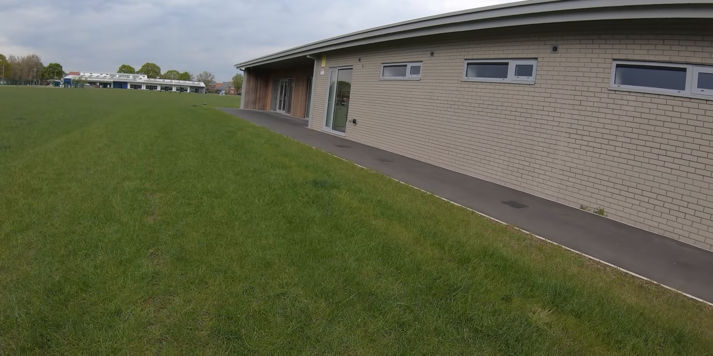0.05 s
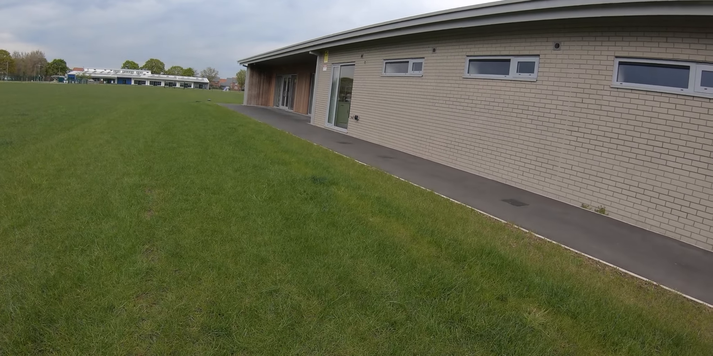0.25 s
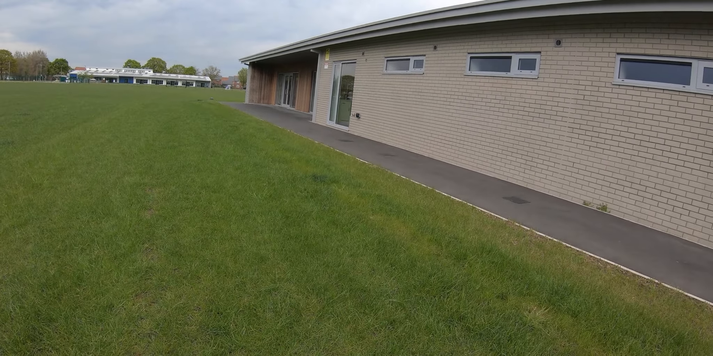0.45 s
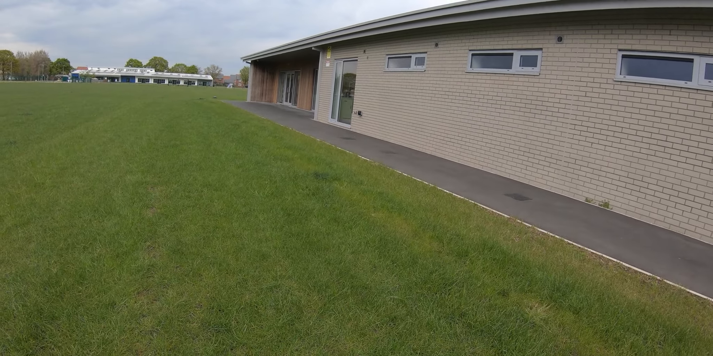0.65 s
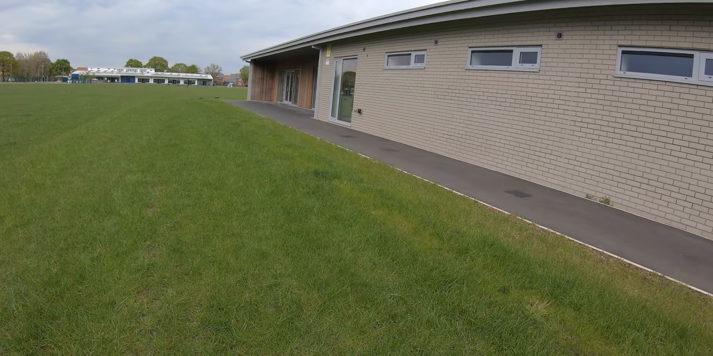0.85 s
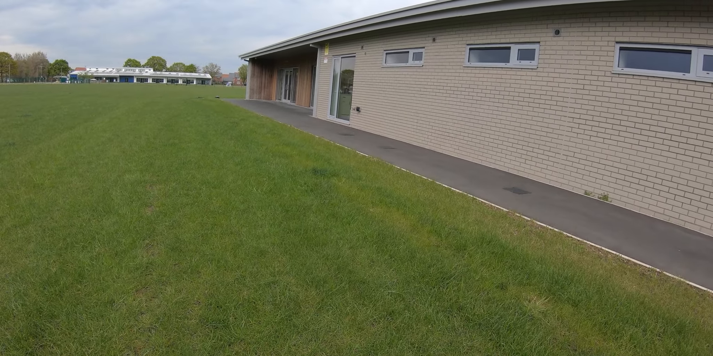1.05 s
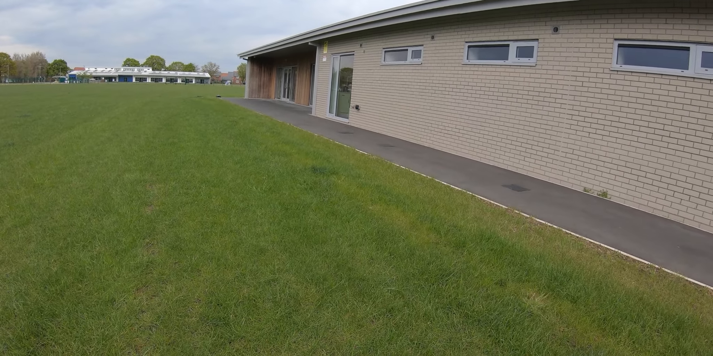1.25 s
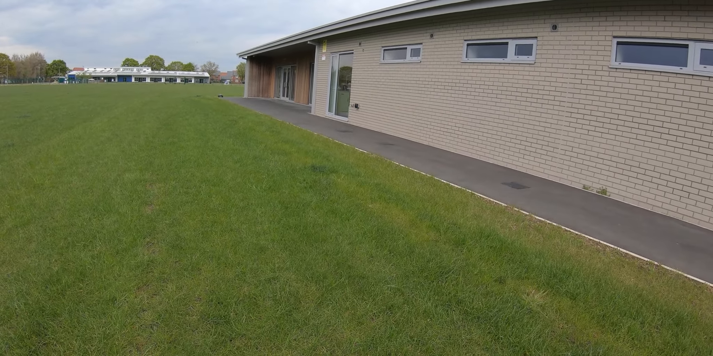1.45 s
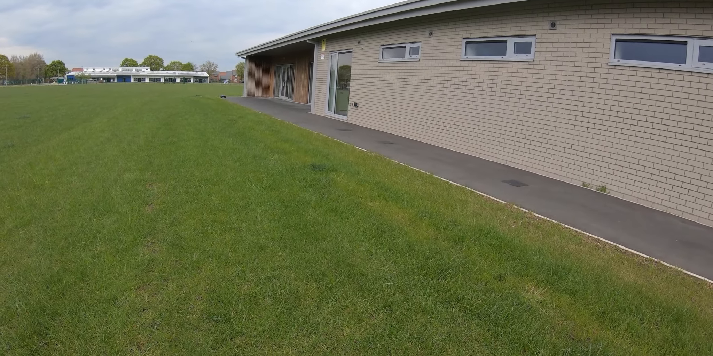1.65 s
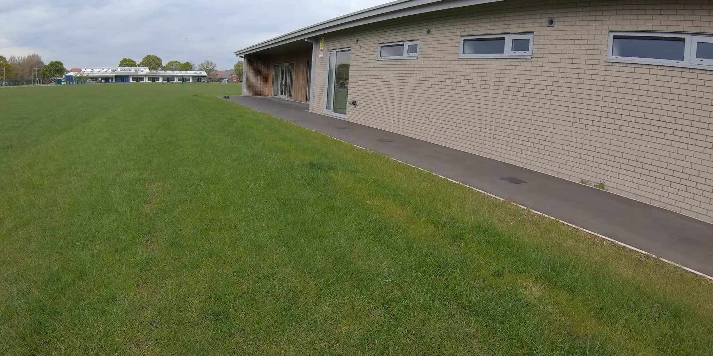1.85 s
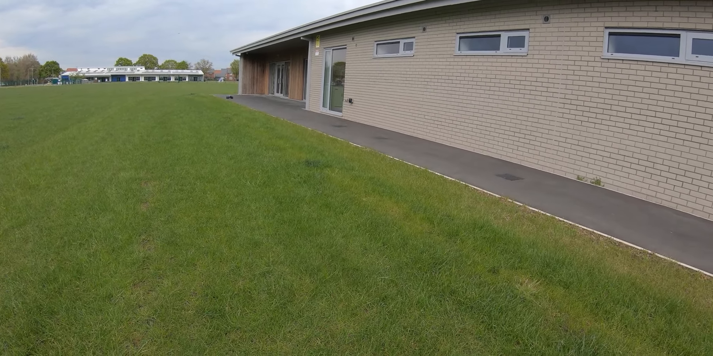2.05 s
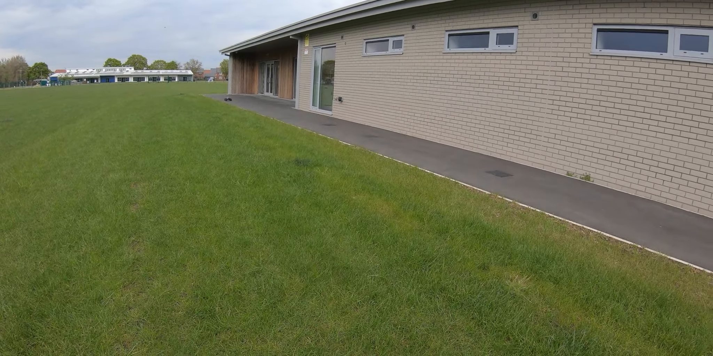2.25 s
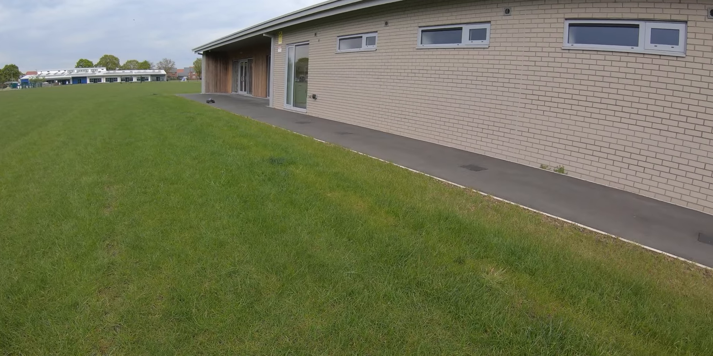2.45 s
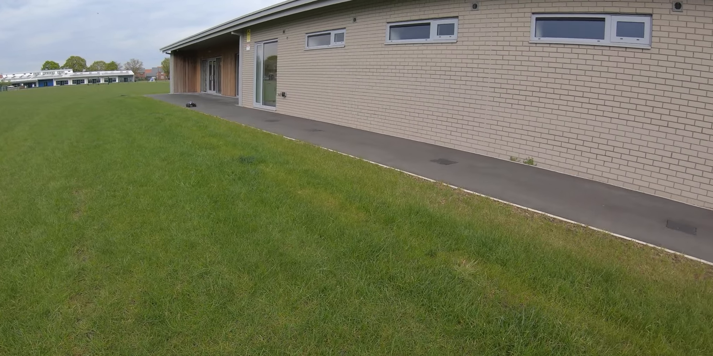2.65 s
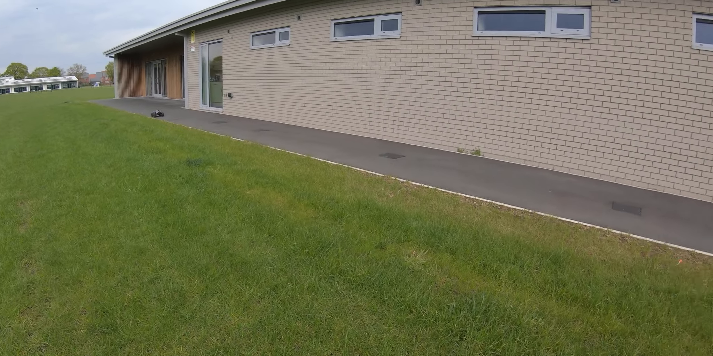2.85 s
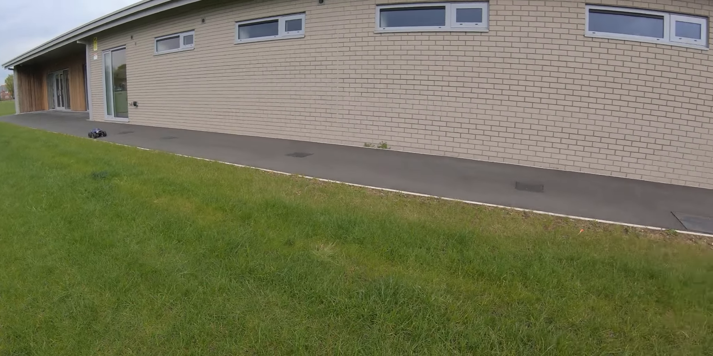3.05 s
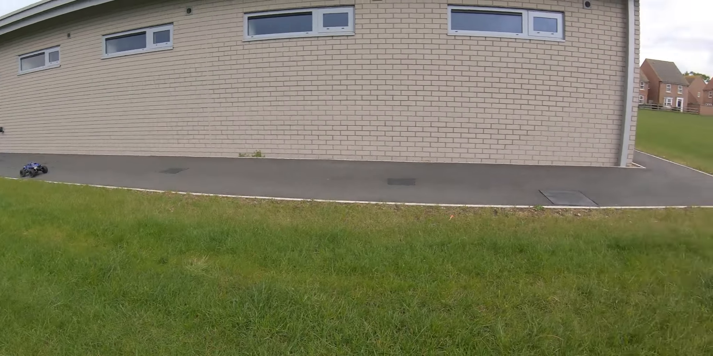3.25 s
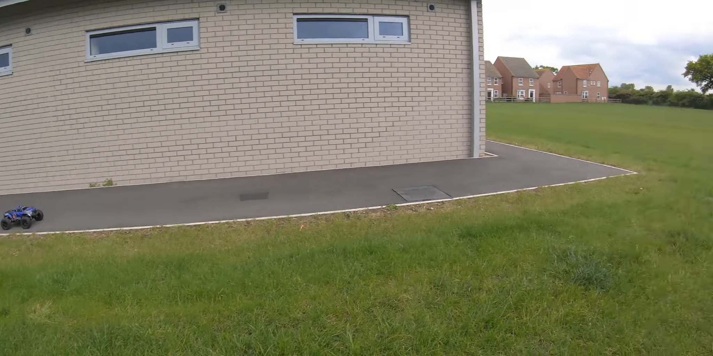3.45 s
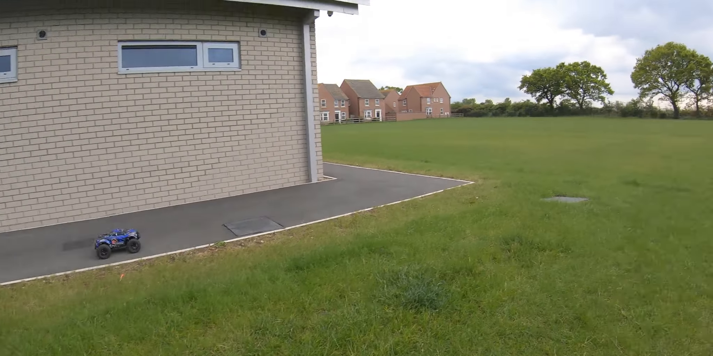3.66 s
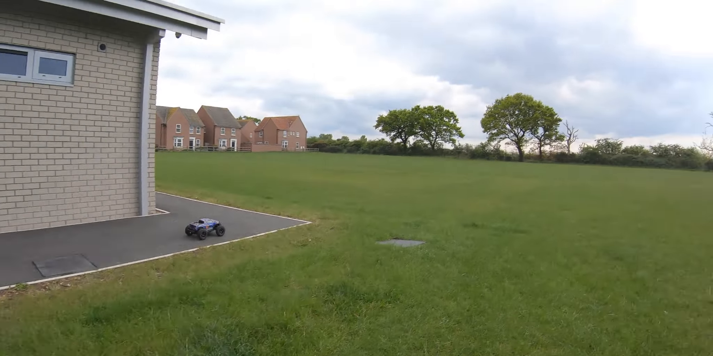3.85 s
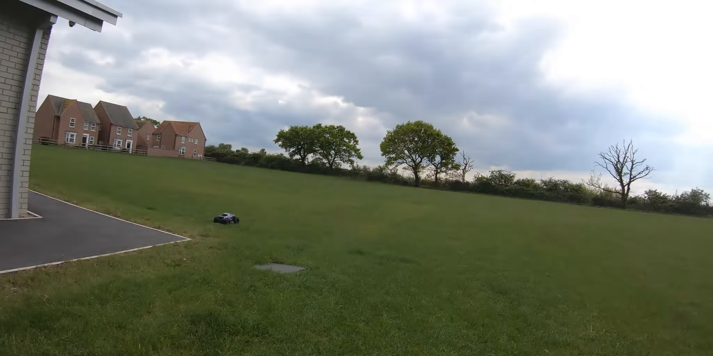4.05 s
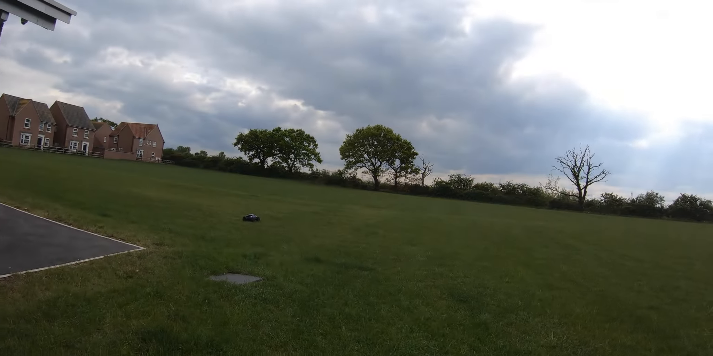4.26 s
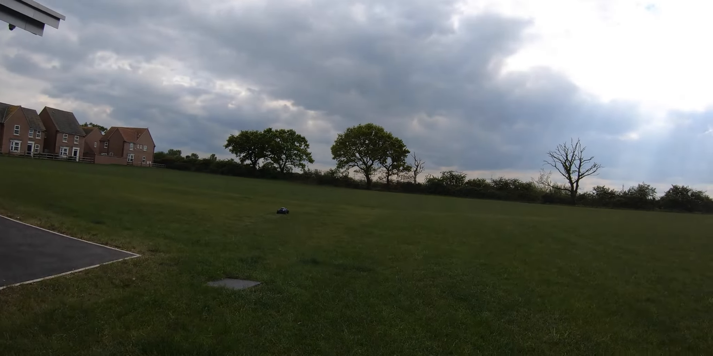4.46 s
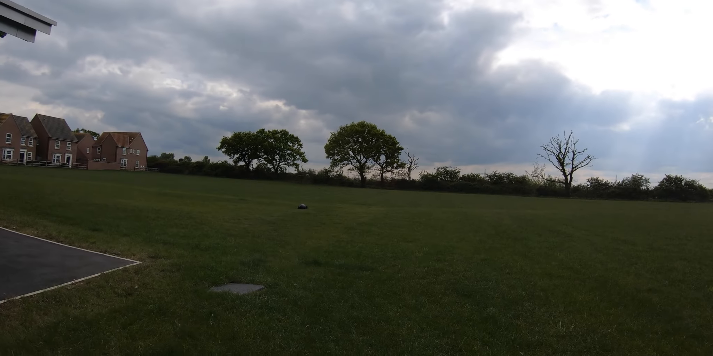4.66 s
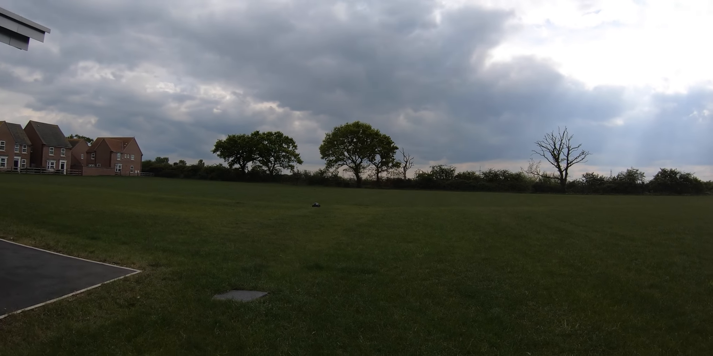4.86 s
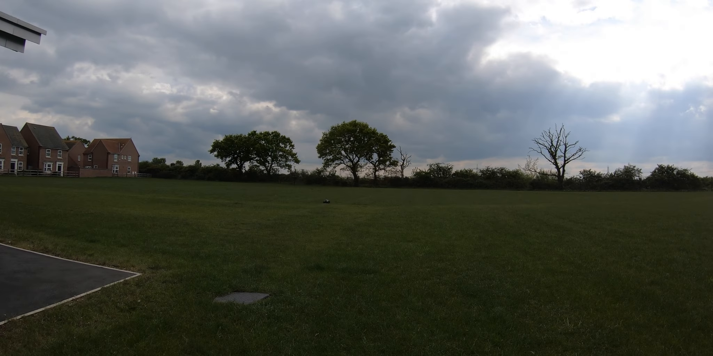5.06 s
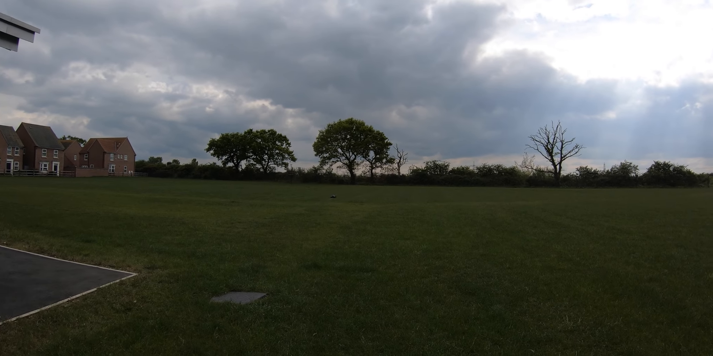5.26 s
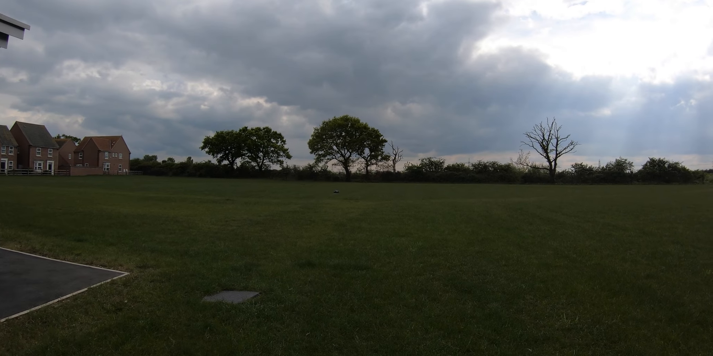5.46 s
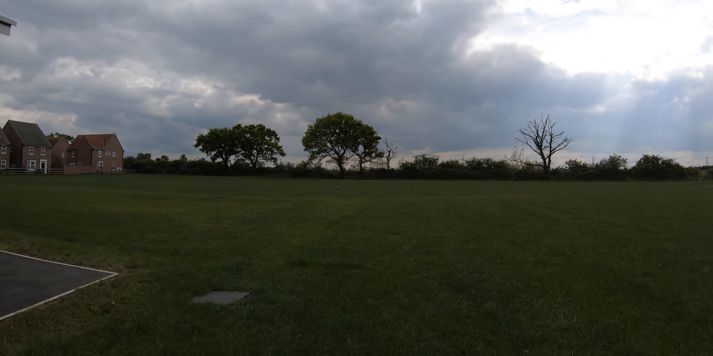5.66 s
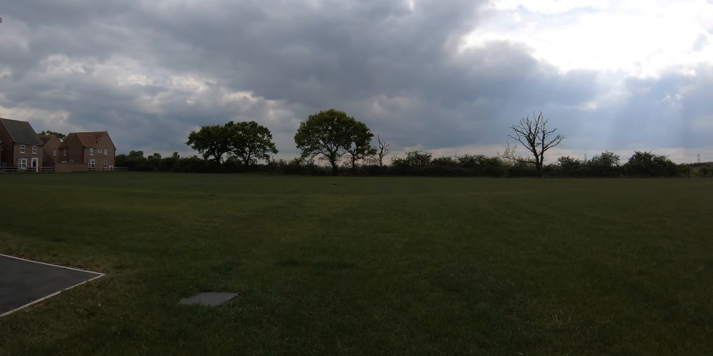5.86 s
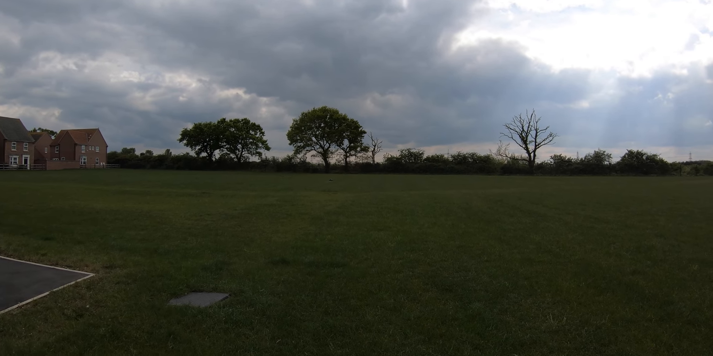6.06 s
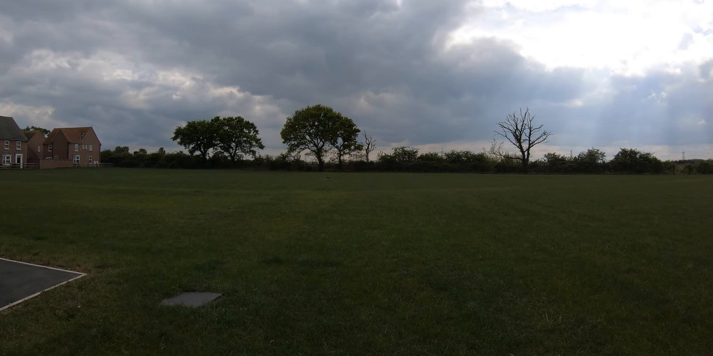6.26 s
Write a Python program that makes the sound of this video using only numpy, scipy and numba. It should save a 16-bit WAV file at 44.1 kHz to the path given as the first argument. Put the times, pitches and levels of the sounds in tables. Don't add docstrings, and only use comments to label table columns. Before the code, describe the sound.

Open field beside a brick wall, hand-held camera microphone. A brief cloth rustle and tiny ticks, then quiet with far traffic drone. A faint electric gear whine wavers, bumps, climbs in pitch and swells as a small model truck speeds past on tarmac, tyres humming and hissing, with a hard knock at closest. It whines away bumpily over grass, fading as low wind thumps buffet the microphone.

```python
import sys
import numpy as np
from scipy import signal
from scipy.fft import rfft, irfft
from scipy.io import wavfile
from scipy.ndimage import uniform_filter1d
from numba import njit

SR = 44100
rng = np.random.default_rng(int(sys.argv[2]) if len(sys.argv) > 2 else 0)


def volts_from_decibels(level):
    exponent = np.asarray(level, float) / 20
    return 10 ** exponent


def materialize(psi):
    bounded = np.clip(np.atleast_2d(psi).T, -1, 1)
    quanta = np.round(bounded * 32767).astype(np.int16)
    wavfile.write(sys.argv[1], SR, quanta)


N = 278535
TIME = np.arange(N) / SR
FREQ = np.fft.rfftfreq(N, 1 / SR) + 1
TARMAC_START_S, TARMAC_END_S = 2.85, 4.1
WALL_ENDS_S = 4.07
CORNER_S = 1.57


def unit(x):
    return x / np.sqrt(np.mean(x ** 2))


def band_unit(x, lo_hz, hi_hz):
    return x / np.std(irfft(rfft(x) * ((FREQ > lo_hz) & (FREQ < hi_hz)), N))


def steady(x, seconds):
    return x / np.sqrt(uniform_filter1d(x ** 2, size=int(seconds * SR)))


def curves(table):
    s, *columns = np.transpose(table)
    gate = np.clip(np.minimum(TIME - s[0] + .05, s[-1] + .05 - TIME) / .05, 0, 1)
    return [gate] + [np.interp(TIME, s, c) for c in columns]


def step(s, width):
    return np.clip((TIME - s) / width + .5, 0, 1)


def swells(table):
    return sum(size * np.exp(-((TIME - s) / max(half_s, .01)) ** 2) for s, size, half_s in table)


def over_hz(table):
    hz, value = np.transpose(table)
    return np.interp(np.log(FREQ), np.log(hz + 1), value)


def coloured(table, x):
    return irfft(rfft(x) * volts_from_decibels(over_hz(table)), N)


@njit
def svf(x, hz, width):
    y, b, l = np.empty(len(x)), 0., 0.
    for i in range(len(x)):
        g, k = np.tan(np.pi * hz[i] / SR), width[i] / hz[i]
        v = (b + g * (x[i] - l)) / (1 + g * (g + k))
        b, l, y[i] = 2 * v - b, l + 2 * g * v, k * v
    return y


def walk(rate):
    k = int(SR / rate)
    held = np.repeat(rng.standard_normal(N // k + 1), k)
    return 1.3 * uniform_filter1d(uniform_filter1d(held, k), k)[:N]


def grit(spread_db, flicker_db, rate):
    grain_db = spread_db * np.minimum(rng.exponential(size=N), 4.5)
    return rng.standard_normal(N) * volts_from_decibels(grain_db + flicker_db * walk(rate))


def pair(colour, spread_db, flicker_db, rate, unlike):
    mid, side = (coloured(colour, grit(spread_db, flicker_db, rate)) for _ in range(2))
    return np.array([mid + unlike * side, mid - unlike * side])


def whine(hz, orders, waver, throb_db, clear_db=0):
    out = 0
    for order, line_db, skirt_db, share in orders:
        pitch = order * hz * (1 + waver * walk(30))
        line = np.sqrt(2) * np.sin(2 * np.pi * np.cumsum(pitch) / SR)
        skirt = svf(svf(rng.standard_normal(N), pitch, share * pitch), pitch, 2 * share * pitch)
        skirt = steady(skirt, .15)
        throb = steady(volts_from_decibels(throb_db * walk(35)), .2)
        out = out + throb * (volts_from_decibels(line_db + clear_db) * line + volts_from_decibels(skirt_db) * skirt)
    return out


def strike(table, crack_share, crack_width, snap, rise_s=.0025):
    out, t = np.zeros((2, N + 8192)), np.arange(8192) / SR
    for (s, db, hz, t60, pan_db), crack in zip(table, rng.standard_normal((len(table), 8192))):
        for _ in range(2):
            crack = svf(crack, np.full(8192, 1. * hz), np.full(8192, crack_width * hz))
        ring = np.sin(2 * np.pi * hz * t) + crack_share * unit(crack) + snap * np.exp(-t * SR / 2)
        decay = np.exp(-np.log(1000) * t / t60)
        rise = 1 - (snap == 0) * np.exp(-(t / rise_s) ** 2)
        i = int(s * SR)
        out[:, i:i + 8192] += volts_from_decibels(db + np.array([[pan_db], [-pan_db]]) / 2) * ring * decay * rise
    return out[:, :N]


# (frequency [Hz], density [dB per Hz])
TOWN_COLOUR = [(35, -34), (60, -15), (183, 9), (440, -8.5), (580, -9), (772, -4), (927, -17), (2770, -20),
               (3560, -8), (4270, -22), (8280, -31), (14000, -60)]


def town():
    return volts_from_decibels(-57) * band_unit(pair(TOWN_COLOUR, spread_db=1.3, flicker_db=0.5, rate=5, unlike=0.33), 100, 630)


# (time [s], level [dB])
RUSTLES = [
    [(0, -53.5), (.1, -55.5), (.2, -51.5), (.3, -55), (.38, -68), (.5, -84)],
    [(5.88, -90), (6.0, -65.5), (6.09, -59.5), (6.2, -61.5), (6.32, -75)],
]
# (frequency [Hz], density [dB per Hz])
RUSTLE_SPECTRUM = [(240, -14), (400, -5.5), (518, -10), (640, -5.5), (734, -6.5), (1820, -2), (4960, -11.5),
                   (7930, -8), (15000, -33)]


def rustle():
    level = sum(on * volts_from_decibels(db) for on, db in map(curves, RUSTLES))
    fibres = pair(RUSTLE_SPECTRUM, spread_db=1.8, flicker_db=1.0, rate=50, unlike=.5)
    return level * band_unit(fibres, 5000, 11000)


# (time [s], peak [dB], ring [Hz], decay t60 [s], left minus right [dB])
DRY_TICKS = [
    (.0235, -24, 2300, .006, 2),
    (.22, -35, 2200, .012, 4),
]


def ticks():
    return strike(DRY_TICKS, crack_share=.2, crack_width=2, snap=1.6) / 2


# (time [s], level [dB], half length [s], sharpness [dB], left minus right [dB])
PORT_GUSTS = [(1.548, -50.5, 0.021, -21, 6), (1.797, -57, 0.067, -28, 6), (2.038, -49.5, 0.033, -24, 0),
              (2.336, -44.5, 0.021, -24, 12), (2.605, -57.5, 0.097, -7, -3), (2.869, -51, 0.017, -3, -12),
              (2.964, -41.5, 0.031, -4.5, 4), (3.187, -49.5, 0.087, 3.5, 2), (3.485, -43.5, 0.084, -1, -8),
              (3.696, -44, 0.12, 6, 2), (3.749, -29, 0.04, 3, 8.5), (3.89, -32, 0.14, -1.5, 5),
              (4.038, -34, 0.071, 0.5, -1.5), (4.2, -38.5, 0.085, -25, -5), (4.383, -46, 0.05, 7.5, -2.5),
              (4.718, -48.5, 0.1, 3.5, -3.5), (5.095, -43, 0.087, -3, -2.5), (5.223, -41.5, 0.028, -19, 18),
              (5.424, -37, 0.071, -9, -4), (5.598, -31.5, 0.045, 0.5, 2.5),
              (5.764, -29.5, 0.12, -12.5, -0.5), (6.079, -30, 0.0096, 3, 8), (6.192, -28, 0.058, -6.5, 3),
              (6.292, -31.5, 0.036, 4, 2.5)]
# (time [s], level [dB])
EARLY_PUFFS = [(.28, -61), (.55, -66), (.78, -61), (1.02, -64), (1.46, -73), (.42, -69), (.66, -70),
               (1.17, -71), (2.18, -63), (2.28, -61)]


def gusts():
    deep = np.full((2, N), volts_from_decibels(-80) ** 2)
    sharp = deep * volts_from_decibels(-12) ** 2
    puffs = [(s, db, 0.023, -21, 0) for s, db in EARLY_PUFFS]
    for s, db, half_s, sharp_db, pan_db in PORT_GUSTS + puffs:
        away = (TIME - s) / max(half_s, .01)
        fall_db = 9 * (np.sqrt(1 + away ** 2) - 1)
        power = volts_from_decibels(db - fall_db) ** 2 * volts_from_decibels(np.array([[pan_db], [-pan_db]]))
        deep, sharp = deep + power, sharp + power * volts_from_decibels(sharp_db) ** 2
    return np.sqrt(deep), np.sqrt(sharp)


def wind():
    deep, sharp = gusts()
    db = 10 * np.log10(deep[0] * deep[1])
    low_hz = np.clip(82.5 + 0.94 * (db + 23.5), 42, 95)
    low_colour = [(15, 17), (30, 8.5), (42, 5), (130, -4.0), (250, -24), (2000, -5)]
    edge_colour = [(70, -15.5), (140, 4.5), (220, -2.5), (400, -25.5), (800, -43.0), (3000, -60), (9000, -110)]
    out = []
    for side in range(2):
        eddies = volts_from_decibels(5.7 * walk(35))
        low = svf(svf(rng.standard_normal(N), low_hz, 0.55 * low_hz), low_hz, 3.0 * low_hz)
        low = steady(coloured(low_colour, low) * eddies, 0.095)
        edge = coloured(edge_colour, rng.standard_normal(N))
        edge = steady(edge * eddies ** 1.5, 0.066)
        out.append(volts_from_decibels(2.5) * deep[side] * low + sharp[side] * edge)
    return np.array(out)


# (time [s], gear mesh [Hz], nearness [dB], load on the teeth [dB])
DRIVE_PATH = [(.35, 670, -60.5, 2), (.72, 755, -65, 1), (.97, 778, -61.5, 5), (1.48, 750.2, -58.5, -5),
              (1.78, 825.1, -53, -3.5), (1.98, 900, -54, -8), (2.1, 1078, -51.5, -1.5),
              (2.48, 1116, -49.5, -2.5), (2.7, 1310, -44.5, 2), (2.85, 1352, -44.5, 3.5),
              (3.1, 1436, -40, 4), (3.48, 1489, -36, 3), (3.75, 1485, -34.5, 10), (3.9, 1470, -37, 4),
              (4.17, 1433, -48.5, 7.5), (4.55, 1420, -52.5, 2.5), (5.6, 1410, -61.5, -2.5),
              (5.95, 1327, -65, -14)]


def drive():
    return curves(DRIVE_PATH)


# (order [mesh rates], line [dB], skirt [dB], skirt width [share of pitch])
MESH_ORDERS = [(1., -4.5, -6.5, .035), (1.048, -20, -9, .06), (.94, -26, -15, .07)]


def mesh_fundamental(wheel_hz, mesh_db):
    return volts_from_decibels(mesh_db) * whine(wheel_hz, MESH_ORDERS, waver=.0015, throb_db=1.5)


# (order [mesh rates], line [dB], skirt [dB], skirt width [share of pitch])
MESH_OVERTONES = [(2., -6.5, -3.5, .045), (3., -8.5, -5, .04)]
# (order [mesh rates], line [dB], skirt [dB], skirt width [share of pitch])
UPPER_ORDERS = [(3.5, -28, -19, .03), (4., -16, -14, .025), (5., -13, -6, .04), (5.4, -30, -12, .05),
                (6., -30, -19, .04), (7., -30, -21, .04)]
# (time [s], gain [dB], half length [s])
SECOND_SWELLS = [(2.12, -8, .1), (2.35, -14, .15), (2.9, 5, .15), (3.25, 5, .15), (4.2, 4, 0.052),
                 (4.45, 4, 0.075), (4.72, 2, 0.073), (5.1, 0.5, 0.1)]
# (time [s], gain [dB], half length [s])
SHRIEK = [
    (4.23, 12, 0.074),
]
# (frequency [Hz], gain [dB])
SHELL_RING = [(2400, -2), (3000, -1), (3500, 2.5), (4000, 2), (4500, 1.5)]


def mesh_overtones(hz, wheel_hz, over_db):
    second = whine(wheel_hz, MESH_OVERTONES[:1], waver=.004, throb_db=1.3, clear_db=1)
    second = volts_from_decibels(swells(SECOND_SWELLS)) * second
    third = whine(wheel_hz, MESH_OVERTONES[1:], waver=.006, throb_db=2.2)
    third = volts_from_decibels(-4.5 * step(2.9, .3)) * third
    fast = np.clip((hz - 1150) / 300, 0, 1)
    top_db = over_db - 11 * (1 - fast) - 2 * step(TARMAC_END_S, .2) + swells(SHRIEK)
    top = volts_from_decibels(top_db) * whine(wheel_hz, UPPER_ORDERS, waver=.003, throb_db=2.5)
    return coloured(SHELL_RING, volts_from_decibels(over_db) * (second + third)) + top


# (order [pinion rates], line [dB], skirt [dB], skirt width [share of pitch])
PINION_ORDERS = [(1., -14, -4, .04), (.9, -26, -11, .04), (2., -36, -23, .04)]
# (order [pinion rates], line [dB], skirt [dB], skirt width [share of pitch])
CRAWL_ORDERS = [(.88, -17, -8, .04), (.94, -20, -11, .03), (1.06, -26, -16, .035)]
# (time [s], gain [share of pitch], half length [s])
MOTOR_SURGES = [(1.22, .08, .04), (1.85, .07, 0.04), (2.12, .04, 0.039), (2.58, -.03, .03),
                (2.67, .01, .02), (2.73, .03, 0.017), (2.8, -.02, .04), (4.5, -.015, .05),
                (4.65, 0.0044, .04), (4.95, -.015, .05), (5.12, -0.021, 0.053), (5.22, 0.018, 0.042),
                (5.36, -.02, 0.031), (5.46, .015, .04), (5.66, 0.0026, .04)]
# (time [s], gain [dB], half length [s])
BURSTS = [(.62, 10, .03), (.78, 10, 0.02), (.97, 5, 0.039), (1.16, 10, 0.011), (1.29, 4.5, 0.032),
          (4.15, 3, 0.045), (4.67, 5, 0.03), (4.8, 3.5, 0.057), (5.05, 2, 0.027), (5.22, 1.5, 0.033),
          (5.38, 5, 0.06), (5.52, 0, 0.032), (5.7, 4, 0.056), (1.8, 6, 0.069), (1.95, 0, 0.052),
          (2.63, 3, 0.047), (2.75, -2.5, .04), (2.95, 0.5, .1), (3.15, -6, 0.13)]


def pinion(hz, near_db, slip):
    crawl_hz = np.minimum(3700, 4.9 * hz)
    pinion_hz = np.maximum(4.48 * hz, crawl_hz) * (1 + swells(MOTOR_SURGES))
    level_db = -10 * np.log10(volts_from_decibels(-near_db - 4) ** 2 + volts_from_decibels(41.5) ** 2)
    level_db = level_db + 1.5 * step(TARMAC_END_S, 0.37) * (walk(19) - .6)
    level_db = level_db - 8 * (1 - step(0.65, 0.19))
    clear_db = 7 * step(2.45, .3)
    tone = whine(pinion_hz * slip, PINION_ORDERS, waver=.006, throb_db=2.5, clear_db=clear_db)
    strand = whine(pinion_hz, CRAWL_ORDERS, waver=.01, throb_db=3)
    tone = volts_from_decibels(swells(BURSTS)) * tone + np.clip((5000 - pinion_hz) / 700, 0, 1) * strand
    return volts_from_decibels(level_db) * tone


# (time [s], overtone gain [dB], half length [s])
GRIP_SWELLS = [(1.98, 8, .06), (2.11, 12, .03), (2.19, -8, 0.046), (2.35, 5, .08), (2.48, 13, 0.052),
               (2.63, 3.5, 0.12), (2.77, -23, 0.042), (2.95, -1.5, .1), (3.3, -5.5, 0.2), (3.75, -2, 0.089),
               (4.75, 4.5, 0.068), (5.35, 0, .08)]
# (time [s], gain [share of pitch], half length [s])
WHEEL_WOBBLES = [(2.2, -0.022, .04), (2.33, 0.013, 0.047), (2.48, -.015, 0.037), (2.6, .015, 0.036),
                 (2.71, -0.028, 0.036), (4.2, .03, .03), (4.68, .01, 0.049), (4.77, -.02, .035),
                 (4.98, .02, .06), (5.12, -.02, .04), (5.24, 0.01, .05), (5.45, -0.021, 0.042),
                 (5.62, .015, 0.063)]
# (frequency [Hz], gain [dB])
GEAR_TOP_FADE = [(10500, 0), (12200, -22), (15000, -50)]


def gears():
    on, hz, near_db, load_db = drive()
    _, air, sag, bite_db = hops()
    hz = hz * (1 + .015 * air - sag)
    slack_db = -15 * air
    mesh_db = near_db + load_db + slack_db + bite_db
    over_db = near_db + 0.049 * load_db + 0.63 * bite_db + 0.086 * slack_db
    over_db = over_db - 6.5 * np.clip((1000 - hz) / 150, 0, 1)
    over_db = np.minimum(over_db + swells(GRIP_SWELLS), mesh_db + 6)
    smooth = np.clip(np.minimum(TIME - TARMAC_START_S, TARMAC_END_S - TIME) / .15, 0, 1)
    slip = 1 + (.009 - .0075 * smooth) * walk(22)
    wheel_hz = hz * slip * (1 + swells(WHEEL_WOBBLES))
    mesh = mesh_fundamental(wheel_hz, mesh_db) + mesh_overtones(hz, wheel_hz, over_db) + odd_axles(near_db)
    return coloured(GEAR_TOP_FADE, on * (mesh + pinion(hz, near_db, slip))) + tread(hz, near_db)


# (frequency [Hz], density [dB per Hz])
HISS_COLOUR = [(300, -9), (600, -6.5), (1200, -3), (2200, -0.5), (3000, 1.5), (3800, -3), (5300, -7),
               (7500, -7.5), (8300, -10.5), (9000, -17.5), (10300, -16), (12000, -25.5), (14000, -28.5),
               (15500, -60)]
# (time [s], hiss gain [dB], half length [s])
GRASS_TUFTS = [(4.08, 2.5, 0.053), (4.22, 4, 0.069), (4.45, -3, 0.046), (4.7, 2, 0.16), (5.02, -4.5, 0.13),
               (5.25, 1.5, 0.059), (5.42, 3, 0.025), (5.52, 0, 0.044), (5.7, 4, .05)]
# (frequency [Hz], gain [dB])
GRASS_CANCEL = [(1300, 5), (2200, -2.5), (3600, 1.5), (7500, 2), (9000, -1), (13000, -6)]
# (frequency [Hz], gain [dB])
FAR_CANCEL = [(400, 13), (560, -13), (750, -1.5), (1500, 4), (2200, -0.5), (2800, -5), (3400, -5),
              (4500, -1.5)]


def tyre_hiss():
    on, _, near_db, _ = drive()
    treble_db = -6.5 - 3.5 * np.maximum(4.82 - TIME, 0)
    treble_db = treble_db - 34 * (1 - step(CORNER_S, 0.56))
    tufts_db = swells(GRASS_TUFTS)
    hiss = 0
    for centre_hz in 350 * 2 ** np.arange(0, 5.6, .5):
        grains = grit(spread_db=2.5, flicker_db=-1.73, rate=7.27)
        band = svf(grains, np.full(N, centre_hz), np.full(N, centre_hz / 2.14))
        lost = np.clip(centre_hz / 9500, 0, 1.5) ** 2.83
        band_db = lost * (treble_db + 11.5) + min(centre_hz / 5000, 1) * tufts_db
        hiss = hiss + band / np.std(band) * np.sqrt(centre_hz / 2000) * volts_from_decibels(band_db)
    hiss = volts_from_decibels(near_db - 3) * coloured(HISS_COLOUR, hiss * volts_from_decibels(.8 * walk(25)))
    on_grass = step(WALL_ENDS_S + 0.16, 1.0)
    hiss = (1 - on_grass) * hiss + on_grass * coloured(GRASS_CANCEL, hiss)
    hidden = 1 - step(CORNER_S, 0.61)
    hiss = (1 - hidden) * hiss + hidden * coloured(FAR_CANCEL, hiss)
    spray = volts_from_decibels(7.5) * hops()[0] / volts_from_decibels(near_db + 18.5)
    return on * hiss * np.sqrt(1 + spray ** 2)


# (time [s], pitch [Hz], level over nearness [dB])
FREE_WHEEL_PATH = [
    (.9, 1566, -21),
    (1.13, 1570, 4),
    (1.2, 1786, 2),
    (1.27, 1753, -6),
    (1.31, 1620, 6),
    (1.36, 1610, -9),
]
# (time [s], pitch [Hz], level over nearness [dB])
REAR_AXLE_PATH = [
    (1.85, 1710, -15),
    (1.96, 1790, -8),
    (2.05, 1930, 1.5),
    (2.12, 2090, -7),
    (2.27, 2134, -6),
]
# (time [s], mesh [Hz], level over nearness [dB])
WHEELSPIN_PATH = [
    (2.1, 1278, -7),
    (2.3, 1268, -2),
    (2.62, 1258, 10),
]
# (order [mesh rates], line [dB], skirt [dB], skirt width [share of pitch])
WHEELSPIN_ORDERS = [(1., -14, -8, .06), (3., -19, -14, 0.025)]


def odd_axles(near_db):
    free, free_hz, free_db = curves(FREE_WHEEL_PATH)
    out = free * volts_from_decibels(near_db + free_db) * whine(free_hz / 2, MESH_OVERTONES[:1], waver=.02, throb_db=3)
    lagging, rear_hz, rear_db = curves(REAR_AXLE_PATH)
    rear = whine(rear_hz / 2, MESH_OVERTONES[:1], waver=.008, throb_db=2)
    out = out + lagging * volts_from_decibels(near_db + rear_db) * rear
    spinning, spin_hz, spin_db = curves(WHEELSPIN_PATH)
    front = whine(spin_hz, WHEELSPIN_ORDERS, waver=0.0104, throb_db=-0.5)
    return out + spinning * volts_from_decibels(near_db + spin_db) * front


# (time [s], length [s], first pitch [Hz], last pitch [Hz], level [dB])
BIRD_NOTES = [
    (1.135, .1, 5680, 5440, -66),
    (5.926, 0.045, 3370, 3690, -60),
]


def birds():
    out = np.zeros(N)
    for s, length, first_hz, last_hz, db in BIRD_NOTES:
        u = np.clip((TIME - s) / length, 0, 1)
        phase = 2 * np.pi * np.cumsum(first_hz + (last_hz - first_hz) * u) / SR
        out += volts_from_decibels(db) * np.sin(np.pi * u) ** 0.32 * np.sin(phase)
    return out * volts_from_decibels(2 * walk(34.6))


# (time [s], thud [dB], time in the air [s], speed lost [share])
HOP_LANDINGS = [(1.25, -47.5, 0.097, 0.0039), (1.299, -72, 0.035, 0.048), (3.831, -34.5, 0.021, 0),
                (4.08, -44.5, 0.021, 0.003), (4.325, -40, 0.14, 0.027), (4.699, -45, 0.031, 0.013),
                (5.039, -54, 0.0406, .025), (5.368, -53.5, 0.033, 0.007), (5.58, -56.5, 0.025, 0.0022),
                (5.759, -51.5, 0.021, 0.0016)]


def hops():
    rise_s, sag_s, bite_s = 0.089, .06, .13
    thud, air, sag, bite_db = 0, 0, 0, 0
    for s, db, air_s, share in HOP_LANDINGS:
        since, down = np.maximum(TIME - s, 0), step(s, .02)
        thud = thud + volts_from_decibels(db - 62 * since) ** 2 * step(s - rise_s / 2, rise_s)
        air = air + min(air_s * 8, 1) * step(s - air_s, .02) * (1 - down)
        sag = sag + share * since / sag_s * np.exp(1 - since / sag_s)
        bite_db = bite_db + 75 * air_s * down * np.exp(-(since / bite_s) ** 2)
    return np.sqrt(thud), air, sag, bite_db


# (time [s], peak [dB], ring [Hz], decay t60 [s], left minus right [dB])
CHASSIS_BUMPS = [(1.249, -46.5, 296, 0.04, -4), (1.297, -38.5, 194, 0.043, 0), (1.287, -36, 303, 0.027, 0),
                 (1.33, -59, 376, 0.25, -2), (4.085, -32, 221, 0.25, -1), (4.33, -34, 179, 0.19, -6),
                 (5.045, -45, 378, 0.18, 0), (5.1, -45, 387, 0.26, 0)]


def bumps():
    return strike(CHASSIS_BUMPS, crack_share=1.0, crack_width=1.85, snap=0)


# (time [s], peak [dB], ring [Hz], decay t60 [s], left minus right [dB])
STONE_FLICKS = [(1.25, -36, 1740, 0.032, -6), (1.284, -45, 3500, .06, -4), (1.303, -39, 1720, .03, -6),
                (3.838, -23, 2940, 0.053, -6), (3.844, -24, 796, 0.053, -5), (3.878, -26, 3000, .04, -6)]


def flicks():
    return strike(STONE_FLICKS, crack_share=0.85, crack_width=0.33, snap=0)


def chassis():
    _, _, near_db, _ = drive()
    rolling = step(1.29, 0.079) * (1 - step(5.9, .1))
    level = np.hypot(volts_from_decibels(-55.5 + 1.7 * (near_db + 38.5)), hops()[0])
    colour = [(120, 3.5), (200, -22.0), (340, 10.0), (430, 10.5), (560, 0.5), (700, 2.0), (1500, -1.5), (6000, -83)]
    thud = coloured(colour, grit(spread_db=3, flicker_db=-0.5, rate=31))
    return rolling * level * volts_from_decibels(-2.0) * band_unit(steady(thud, 0.22), 230, 1400)


# (order [mesh rates], line [dB], skirt [dB], skirt width [share of pitch])
KNOB_ORDERS = [(.545, -9.5, -6, 0.17), (.343, -16.5, -20, 0.18)]
# (time [s], gain [dB], half length [s])
KNOB_PATCHES = [
    (1.6, 9, 0.18),
    (1.85, 3, .1),
    (2.3, 0.5, 0.33),
    (2.75, 3.5, 0.079),
    (3.55, 4, 0.2),
]


def tread(hz, near_db):
    drumming = step(1.4, 0.27) * (1 - step(4.11, 0.23))
    tread_db = near_db - 7 + 6.5 * step(2.66, 0.25) + swells(KNOB_PATCHES)
    return drumming * volts_from_decibels(tread_db) * whine(hz, KNOB_ORDERS, waver=.005, throb_db=1.2)


# (time [s], pitch [Hz], level [dB])
BODY_DRUMMING = [(3.2, 230, -57), (3.32, 224.6, -46), (3.5, 212.5, -60), (4.26, 177, -60), (4.33, 177, -42),
                 (4.42, 188, -48), (4.47, 189, -44), (4.54, 205, -46), (4.59, 200, -60), (4.65, 197, -49),
                 (4.75, 192.5, -43.5), (4.83, 188, -54), (4.88, 190, -45.5), (4.95, 183, -60),
                 (5.3, 200, -57), (5.36, 227, -55), (5.45, 200, -68)]


def hollow_body():
    on, body_hz, body_db = curves(BODY_DRUMMING)
    return on * volts_from_decibels(body_db) * whine(body_hz, [(1., -40, 0, .3)], waver=.02, throb_db=2)


def truck():
    return gears() + hollow_body() + tyre_hiss() + chassis()


# (frequency [Hz], level difference [dB])
PORT_LEVELS = [(110, 2), (370, -1), (690, -7), (1270, -11), (2330, -8), (4290, -3), (7900, -.5),
               (14500, -9)]
# (frequency [Hz], phase difference [rad])
PORT_PHASES = [(300, 0), (600, -.4), (1200, .5), (2400, 0), (4100, 0), (6000, -1.2), (8200, -2.8),
               (9200, -.2), (11000, 1.1), (14000, -1.1)]
# (frequency [Hz], coherence squared [0 to 1])
PORT_COHERENCE = [(300, .32), (630, .76), (1400, .66), (3000, .8), (5000, .74), (8000, .47), (14000, .1)]


def ports(direct, scattered):
    pan_db = 4 * step(WALL_ENDS_S, 0.22)
    alike = np.sqrt(np.clip(over_hz(PORT_COHERENCE), 0, 1))
    mid = rfft(direct) * np.sqrt((1 + alike) / 2)
    side = rfft(scattered) * np.sqrt((1 - alike) / 2)
    tilt = volts_from_decibels(over_hz(PORT_LEVELS) / 2) * np.exp(.5j * over_hz(PORT_PHASES))
    return irfft(np.array([(mid + side) * tilt, (mid - side) / tilt]), N) * volts_from_decibels(np.array([pan_db, -pan_db]) / 2)


# (time [s], peak [dB], ring [Hz], decay t60 [s], left minus right [dB])
AIR_SLAPS = [(3.694, -19, 127, 0.11, 18), (3.748, -21.5, 107.5, 0.18, 13), (3.848, -22, 78.7, 0.075, 10),
             (4.225, -31, 53.7, .2, 17), (5.0, -35, 67, .15, 2), (5.39, -34.5, 67, .2, -16),
             (5.565, -19, 62, .08, -2), (5.612, -15.5, 46, 0.12, -4), (5.77, -16.5, 39.6, 0.17, 2),
             (5.885, -22, 45.7, 0.15, 2), (6.23, -18, 45, 0.11, -2), (5.539, -33, 107, 0.036, -1.5),
             (5.629, -8.5, 132, 0.047, 17.5), (5.572, -12, 150, 0.034, -4), (5.925, -17, 120.6, 0.042, 11),
             (3.828, -9, 153, 0.035, 3), (5.731, -7.5, 76.3, 0.054, 7), (6.027, -17, 88, 0.044, 21),
             (6.059, -21, 161, 0.06, 8), (6.087, -11.5, 72.7, 0.044, -5), (6.175, -16, 145, 0.062, 14),
             (6.269, -5.5, 143, 0.033, 23), (6.306, -9, 59, 0.11, 11.5)]


def slaps():
    return strike(AIR_SLAPS, crack_share=.03, crack_width=1, snap=0, rise_s=.006)


# (time [s], peak [dB], ring [Hz], decay t60 [s], left minus right [dB])
CHASSIS_KNOCKS = [
    (3.839, -20, 1330, 0.045, -3),
    (5.681, -42, 1330, 0.048, -13),
    (5.684, -43, 666, 0.044, -12),
    (5.772, -48, 1300, 0.05, -16),
]


def knocks():
    return strike(CHASSIS_KNOCKS, crack_share=1.0, crack_width=0.78, snap=0)


# (time [s], peak [dB], ring [Hz], decay t60 [s], left minus right [dB])
THIN_EDGES = [(5.574, -34, 330, .04, 0), (5.63, -30.5, 330, 0.05, 6), (5.755, -41.5, 354, .12, -2),
              (6.062, -31, 350, 0.055, 5), (6.24, -38, 400, .04, 3), (6.268, -31, 340, .04, 12)]


def slap_edges():
    return strike(THIN_EDGES, crack_share=0.38, crack_width=0.49, snap=0, rise_s=.006)


def scene():
    direct = truck()
    scattered = np.roll(direct, int(.027 * SR))
    hits = ticks() + bumps() + flicks() + slaps() + knocks() + slap_edges()
    return town() + rustle() + wind() + birds() + ports(direct, scattered) + hits


def low_pass(x):
    return signal.sosfilt(signal.butter(12, 15140, fs=SR, output="sos"), x)


def record(dry):
    mix = np.tanh(1.793 * dry) / 1.875
    return low_pass(mix)


dry = scene()
out = record(dry)
materialize(out)
```